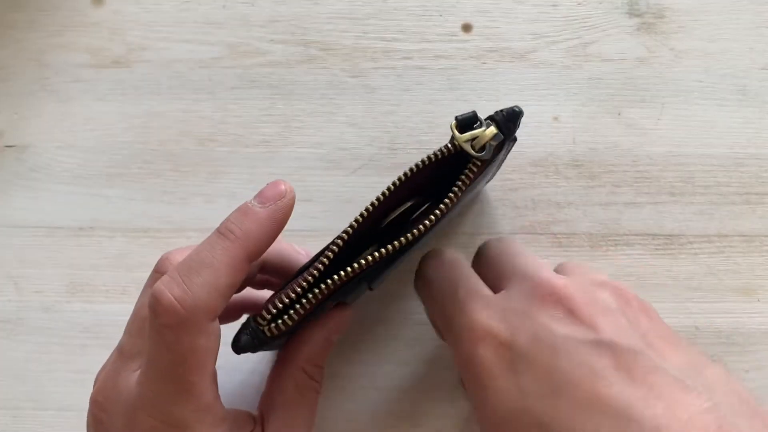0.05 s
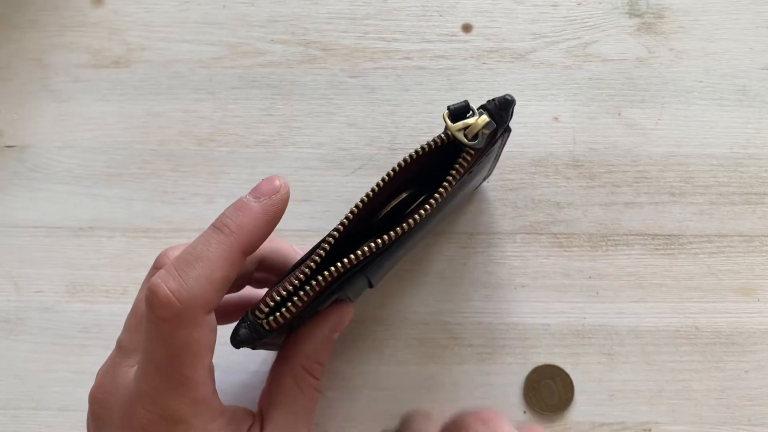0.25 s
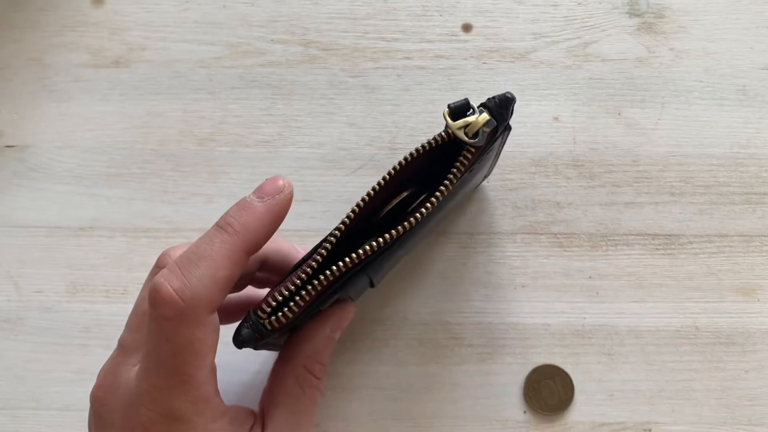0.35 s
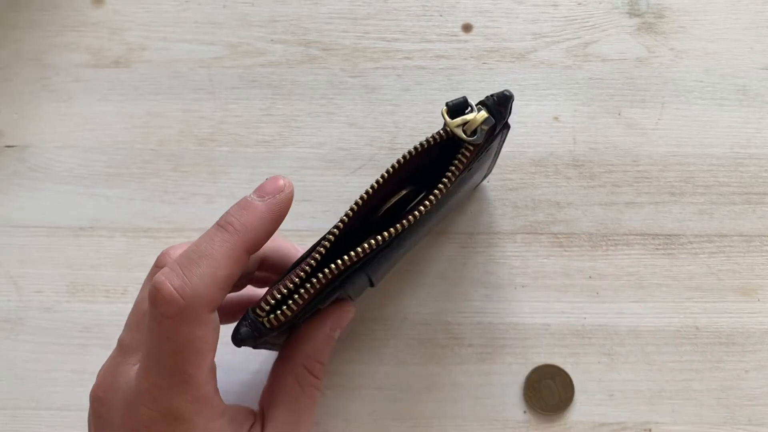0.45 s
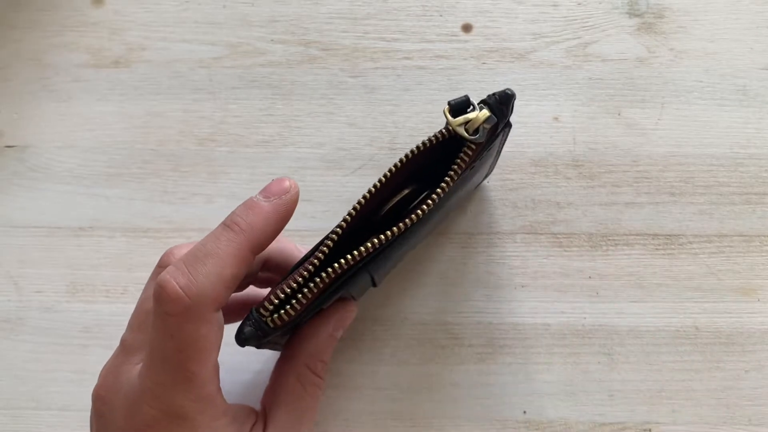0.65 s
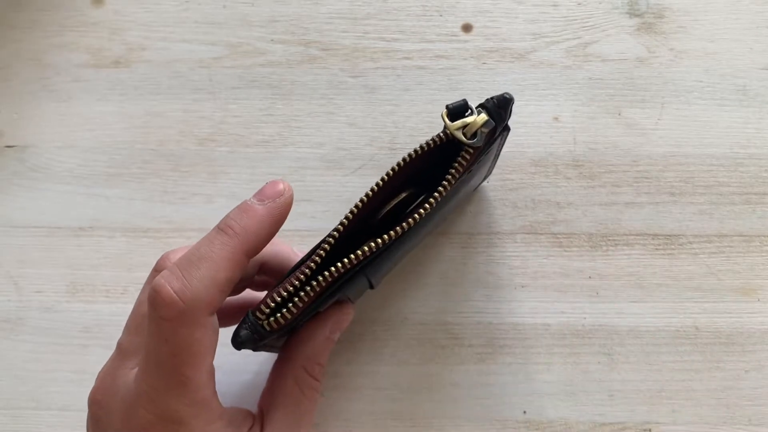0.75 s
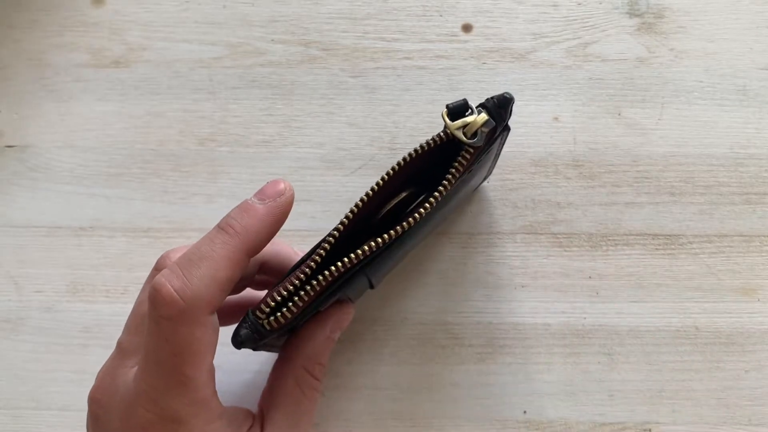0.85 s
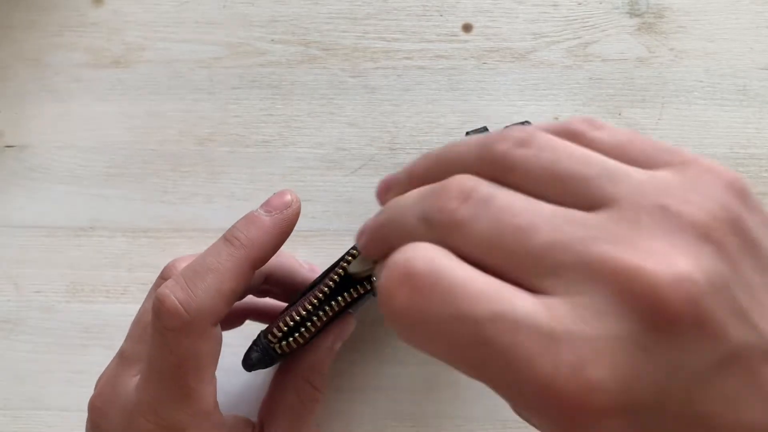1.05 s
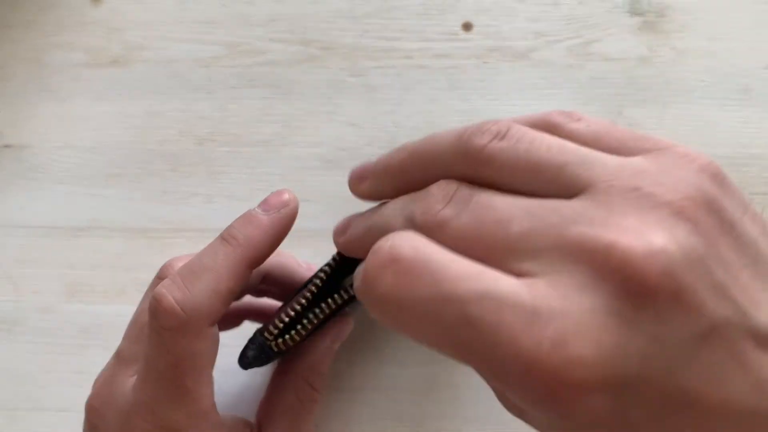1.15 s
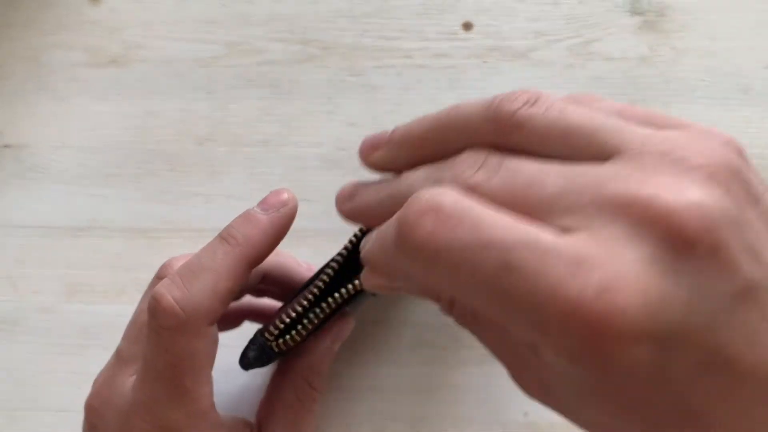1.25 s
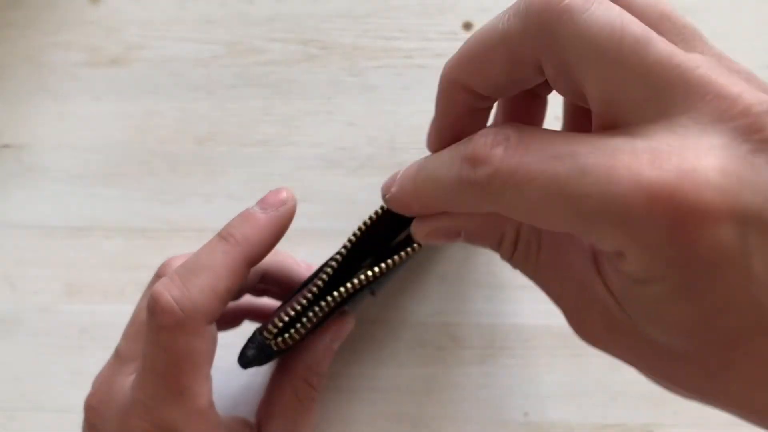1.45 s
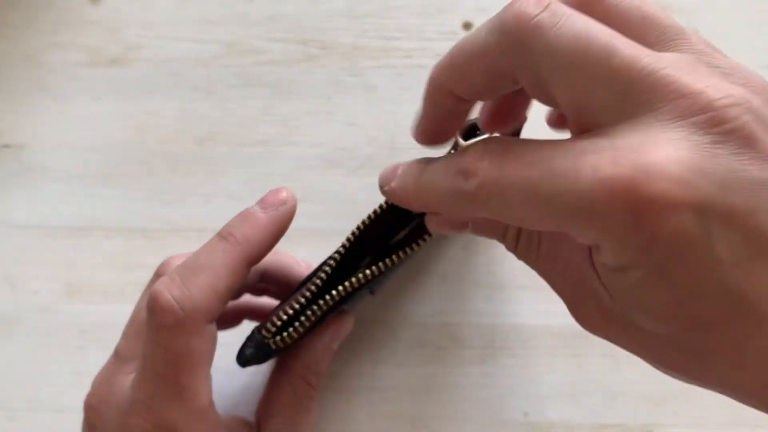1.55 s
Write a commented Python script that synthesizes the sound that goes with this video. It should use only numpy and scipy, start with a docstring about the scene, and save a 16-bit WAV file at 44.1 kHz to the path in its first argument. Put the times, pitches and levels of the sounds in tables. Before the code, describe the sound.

A coin is scraped off a wooden table and put in a leather purse, close up in a small room. A hand scuffs and brushes the wood until 0.4 seconds. Fingers knock onto the coin at 0.55 and drag it briefly, with a tick at the table edge near 0.7. From 1.0 the purse rustles and bumps softly, the coin clicking on zipper teeth around 1.1 and 1.5.

```python
"""A coin is dragged off a wooden table and pushed into a leather purse, close up in a small room.
A hand first brushes over the wood and lands on the coin with a knock. Stick-slip friction, a train of
tiny force pulses, drives the resonances of the wood and of the sliding contact. Short impacts make the
coin tick on the table edge and the zipper teeth, and it rings faintly in one high mode. The purse
rustles, bumps softly and shudders in the low modes of the table top."""
import sys
import numpy as np
from scipy import signal
from scipy.fft import rfft, irfft
from scipy.io import wavfile

SR = 44100
rng = np.random.default_rng(int(sys.argv[2]) if len(sys.argv) > 2 else 0)


def to_wav(sig):
    """Store sig (one row per channel, or 1-D mono) as 16-bit WAV at the path in sys.argv[1].

    Samples outside -1..1 are clipped; the rate is SR.
    """
    pcm = np.clip(np.atleast_2d(sig), -1, 1) * 32767
    pcm = np.round(pcm).astype(np.int16)
    wavfile.write(sys.argv[1], SR, pcm.T)  # frames by channels


N = 70560
T = np.arange(N) / SR

# low modes of the table top: pitch_hz, level_db
TABLE_MODES = [(57, -10), (124, -2.5), (192, -2.5), (250, -12)]


def from_db(db):
    """Decibels to amplitude ratio."""
    return 10 ** (np.asarray(db) / 20)


def rms_one(x):
    """Normalise to unit power."""
    return x / np.sqrt(np.mean(x ** 2) + 1e-20)


def at_hz(points, hz):
    """Interpolate on a logarithmic frequency axis."""
    f, v = np.transpose(points)
    return np.interp(np.log(np.maximum(hz, 1)), np.log(f), v)


def envelope(rows):
    """Amplitude envelope through (time_s, level_db) rows, silent outside them."""
    return from_db(np.interp(T, *np.transpose(rows), left=-200, right=-200))


def swell(peak_s, rise_s, fall_s):
    """Exponential growth and decay about a peak; times are per 20 dB."""
    return from_db(-20 * np.minimum(np.maximum((peak_s - T) / rise_s, (T - peak_s) / fall_s), 10))


def colour(x, spectrum):
    """Minimum-phase filter of unit power gain, built by folding the cepstrum."""
    size = 4096
    gain = rms_one(from_db(at_hz(spectrum, np.arange(size // 2 + 1) * SR / size)))
    cepstrum = irfft(np.log(gain))
    cepstrum[1:size // 2] *= 2
    cepstrum[size // 2 + 1:] = 0
    return signal.fftconvolve(x, irfft(np.exp(rfft(cepstrum))))[:N]


def resonate(x, hz, width_hz):
    """Forced response of a damped resonator with unit peak gain."""
    r = np.exp(-np.pi * width_hz / SR)
    feedback = [1, -2 * r * np.cos(2 * np.pi * hz / SR), r * r]
    return signal.lfilter(np.array([1, 0, -1]) * (1 - r * r) / 2, feedback, x + 1e-18)


def band(x, hz, widths):
    """Two resonators in cascade; their bandwidths are fractions of the centre frequency."""
    return resonate(resonate(x, hz, widths[0] * hz), hz, widths[1] * hz)


def ring(start_s, hz, t60_s):
    """Free vibration of one mode: an exponentially damped sine."""
    age = np.maximum(T - start_s, 0)
    return np.sin(2 * np.pi * hz * age) * np.exp(-np.log(1000) * age / t60_s)


def stick_slip(per_s, spread_db):
    """Friction as shot noise: pulses of uneven size at random moments, with unit power."""
    sizes = from_db(spread_db * np.minimum(rng.exponential(1, N), 4)) * rng.choice([-1, 1], N)
    return rms_one(sizes * (rng.random(N) < per_s / SR))


def impact(start_s, decay_s):
    """Contact force of unit energy: an impulse and a decaying burst of micro-slips."""
    age = np.arange(N) - int(start_s * SR)
    burst = (rng.standard_normal(N) + 2 * (age == 0)) * (age >= 0) * np.exp(-np.abs(age) / (decay_s * SR))
    return burst / np.sqrt(np.sum(burst ** 2))


def radiate(force, spectrum):
    """Each slip radiates its own way, which decorrelates the channels, most of all in the treble."""
    # side level relative to mid: frequency_hz, level_db
    sideways = [(100, -8), (1500, -7.5), (8000, -2.5), (11000, -2.5), (13000, 13.5)]
    mid = colour(force, spectrum)
    scattered = colour(force * rng.choice([-1, 1], N), spectrum)
    side_gain = np.sqrt(np.mean(from_db(at_hz(sideways, np.linspace(0, SR / 2, N))) ** 2))
    return mid + side_gain * colour(scattered, sideways) * np.array([[1], [-1]])


def wood(x, t60_s=0.03, ring_gain=.75):
    """The dense, irregular modes of the table top add an impulse response of decaying noise."""
    t = T[:SR // 10]
    modes = rng.standard_normal(len(t)) * from_db(-60 * t / t60_s)
    ringing = signal.fftconvolve(x, modes[None] / np.sqrt(np.sum(modes ** 2)), axes=1)[:, :N]
    return (x + ring_gain * ringing) / np.hypot(1, ring_gain)


def at_purse(x, lag_s=.00009):
    """Time and level differences: sound from the purse arrives earlier and louder on the left."""
    return np.array([x * from_db(2.5), np.interp(T - lag_s, T, x)])


def wander(x, pitch_share=.007, rate_hz=14):
    """Frequency modulation: resonances drift as the contact point travels over the wood."""
    drift = rms_one(resonate(rng.standard_normal(N), rate_hz, rate_hz))
    delay = pitch_share * np.cumsum(drift) / SR
    return np.array([np.interp(T - delay, T, channel) for channel in x])


def air():
    """Ambient noise: a quiet, steady floor, strongest in the bass."""
    # noise spectrum: frequency_hz, level_db
    spectrum = [(25, -42), (150, 12.5), (400, -0.5), (1000, -9), (16000, -35.5)]
    return from_db(-69) * radiate(rng.standard_normal(N), spectrum)


def room(x, build_s=0.0039):
    """Reverberation: a diffuse field decays in octave bands, faster and wider in the treble."""
    # reverberation time: frequency_hz, t60_s
    decay_times = [(550, 0.68), (1300, 0.15), (5000, 0.16), (12000, 0.089)]
    # strength of the tail: frequency_hz, level_db
    levels = [(150, -11), (600, -6.5), (12000, -10.5)]
    # stereo width: frequency_hz, side_to_mid_ratio
    widths = [(150, 0.21), (600, 0.12), (3000, 0.81)]
    t, tail = T[:SR * 3 // 4], 0
    for hz in 80 * 2. ** np.arange(8):
        shape = from_db(-60 * t / at_hz(decay_times, hz)) * (1 - np.exp(-t / build_s))
        octave = signal.butter(2, [hz / np.sqrt(2), hz * np.sqrt(2)], "band", fs=SR, output="sos")
        reflections = rng.standard_normal((2, len(t))) * shape / np.sqrt(np.sum(shape ** 2))
        mid, side = signal.sosfilt(octave, reflections)
        tail += from_db(at_hz(levels, hz)) * (mid + at_hz(widths, hz) * side * np.array([[1], [-1]]))
    return signal.fftconvolve(x, tail, axes=1)[:, :N]


def low_hum():
    """Room modes: a faint, hollow hum of narrow low resonances in the room."""
    # noise that drives the hum: time_s, level_db
    drive_levels = [(0, -28), (.85, -38), (1.1, -42)]
    # long-ringing room modes: pitch_hz, level_db
    modes = [(160, -7.5), (303, -1), (378, 2), (495, -10), (603, -4)]
    drive = envelope(drive_levels) * rng.standard_normal(N)
    return sum(from_db(db) * resonate(drive, hz, width_hz=8) for hz, db in modes)


def purse(undertone_ratio=0.594, undertone_db=-21):
    """Leather rustles by friction; soft bumps sound two purse modes; its shudder drives the table's."""
    # rustle under the fingers: time_s, level_db
    rustle = [(.96, -72), (.99, -55.5), (1.06, -69.5), (1.14, -63.5), (1.2, -67.5), (1.28, -100),
              (1.47, -87.5), (1.52, -58.5), (1.6, -73)]
    # spectrum of the leather: frequency_hz, level_db
    spectrum = [(200, 10.5), (1700, 13.5), (3500, 11), (6500, 0), (9000, -24), (15000, -11)]
    # bumps on the table: peak_s, level_db, pitch_hz
    contacts = [(1.009, -35, 195.6), (1.056, -41.5, 189.6), (1.102, -49, 122), (1.151, -40, 181.5),
                (1.198, -51, 120.6), (1.513, -39.5, 194), (1.554, -47.5, 168)]
    # shudder over the table: time_s, level_db
    shudder = [(.975, -72), (1.0, -49.5), (1.23, -55), (1.33, -64), (1.485, -74.5), (1.515, -46.5),
               (1.6, -54.5)]
    leather = at_purse(colour(envelope(rustle) * stick_slip(per_s=3400, spread_db=4.5), spectrum))
    bumps = 0
    for s, db, hz in contacts:
        phase = 2 * np.pi * hz * (T - s)
        tone = np.cos(phase) + from_db(undertone_db) * np.cos(undertone_ratio * phase)
        bumps += from_db(db) * swell(s, rise_s=.022, fall_s=.032) * tone
    slips = rng.standard_normal(N)
    modes = sum(from_db(db) * rms_one(band(slips, hz, widths=(0.034, 1))) for hz, db in TABLE_MODES)
    return leather + bumps + envelope(shudder) * modes


def hand_brush():
    """Sliding friction of skin excites the wood in one long brush and several short scuffs."""
    # the long brush: time_s, level_db
    stroke = [(.165, -84.5), (.198, -47.5), (.248, -38), (.275, -32), (.33, -33), (.372, -38),
              (.392, -36.5), (.412, -54.5), (.47, -83)]
    # its spectrum: frequency_hz, level_db
    brush_spectrum = [(120, -43.5), (200, -11), (470, -23), (600, -7), (1500, 4), (8580, -0.5), (12200, -3),
                      (14500, -67.5)]
    # short scuffs: peak_s, level_db, rise_s, fall_s
    touches = [(.007, -48, 0.01, 0.089), (0.082, -38.5, .005, 0.056), (0.175, -38, 0.0046, 0.044),
               (0.422, -36, 0.0035, 0.021), (0.729, -46, 0.0049, 0.03)]
    # their spectrum: frequency_hz, level_db
    scuff_spectrum = [(120, -31), (200, -19.5), (1230, -2.5), (2650, -1), (3310, -5), (5130, -0.5),
                      (11500, -17), (16000, -47)]
    brush = radiate(envelope(stroke) * stick_slip(per_s=3000, spread_db=3.5), brush_spectrum)
    scuffing = sum(from_db(db) * swell(s, rise, fall) for s, db, rise, fall in touches)
    scuffs = radiate(scuffing * stick_slip(per_s=9000, spread_db=7.0), scuff_spectrum)
    return wood(brush + scuffs)


def skin_catches():
    """Skin catches on the grain: sparse stick-slip pulses give gritty bands of treble."""
    # catches: peak_s, level_db, fall_s, centre_hz
    catches = [(0.255, -33.5, 0.0049, 2750), (0.266, -34.5, .05, 3830), (0.314, -30, .035, 4480),
               (0.389, -33, 0.032, 4900)]
    grit = stick_slip(per_s=890, spread_db=-1.0)
    return sum(from_db(db) * swell(s, .004, fall) * rms_one(band(grit, hz, widths=(0.38, 0.38)))
               for s, db, fall, hz in catches)


def hand_rubs():
    """Dull rubs and bumps of the hand: band-limited noise carries a vague pitch."""
    # rubs: peak_s, level_db, rise_s, fall_s, centre_hz
    rubs = [(.008, -40, 0.026, 0.031, 668), (0.01, -48, 0.04, .12, 295), (0.11, -54.5, 0.084, 0.13, 189),
            (0.223, -39, 0.04, 0.084, 690), (.285, -45, 0.13, 0.021, 1260),
            (0.339, -40, 0.0059, 0.031, 329), (0.396, -46.5, 0.028, 0.033, 746),
            (1.072, -51.5, 0.008, 0.01, 887)]
    sound = 0
    for s, db, rise, fall, hz in rubs:
        friction = rms_one(band(rng.standard_normal(N), hz, widths=(0.28, 1)))
        sound += from_db(db) * swell(s, rise, fall) * friction
    return sound


def coin_ticks():
    """Brief metal impacts give broadband ticks; the loosely held coin vibrates freely in a high mode."""
    # impacts on the table edge and zipper teeth: start_s, level_db, pitch_hz
    ticks = [(.729, -19.5, 9900), (1.1085, -17, 3376), (1.1243, -19, 5370), (1.1772, -24.5, 3320),
             (1.4872, -40.5, 3143), (1.5145, -19, 3220), (1.542, -29.5, 10200), (1.56, -18, 6240),
             (1.5786, -21.5, 7300)]
    # their broadband spectrum: frequency_hz, level_db
    spectrum = [(400, -21), (1400, -7), (3300, 2.5), (4700, 0.5), (6700, 9.5), (8500, -17), (12000, -22),
                (16000, -12.5)]
    # free rings of the coin: start_s, level_db
    rings = [(1.5142, -40), (1.5597, -47)]
    clicks = 0
    for s, db, hz in ticks:
        force = from_db(db) * impact(s, decay_s=.0005)
        clicks += 1.016 * colour(force, spectrum) + 3.2 * band(force, hz, widths=(.3, .3))
    ringing = sum(from_db(db) * ring(s, hz=14940, t60_s=0.12) for s, db in rings)
    waver = rms_one(resonate(rng.standard_normal(N), hz=60, width_hz=120))
    return at_purse(clicks + ringing * (1 + .5 * waver))


def coin_drag(crossover_hz=6500):
    """The fingers' impact, then stick-slip friction, excite the contact resonances of coin on wood."""
    # effort of the drag: time_s, level_db
    effort = [(.53, -68.5), (.538, -30), (.564, -26.5), (.577, -25.5), (.596, -23.5), (.614, -25.5),
              (.642, -37), (.66, -32.5), (.675, -49.5), (.72, -58.5)]
    # spectrum of the scrape: frequency_hz, level_db
    scrape_spectrum = [(150, -34.5), (566, -10.5), (1340, -9.5), (1530, -2.5), (4490, -1), (9820, -7),
                       (12400, -15), (16000, -111)]
    # gain above the crossover: time_s, gain_db
    treble = [(.55, -8.5), (.59, 3), (.67, 3)]
    # the fingers land on the coin: start_s, level_db
    landings = [(.537, -3.5)]
    # spectrum of that knock: frequency_hz, level_db
    knock_spectrum = [(120, -23.5), (300, 1), (800, 3), (2500, 9.5), (5500, -1), (11000, -31),
                      (14000, -62.5)]
    # resonances of the coin pressed on the wood: pitch_hz, width_hz, level_db
    contact_modes = [(1554, 89, -2), (2320, 50, -0.5), (2634, 140, 1.5), (3890, 84, 0.5), (4336, 170, 4),
                     (5140, 290, 3.5)]
    edge_slip = from_db(-32.5) * swell(peak_s=.783, rise_s=.012, fall_s=.026)
    friction = (envelope(effort) + edge_slip) * stick_slip(per_s=3500, spread_db=2.5)
    scrape = radiate(friction, scrape_spectrum)
    crossover = (signal.butter(2, crossover_hz, kind, fs=SR, output="sos") for kind in ("low", "high"))
    low, high = (signal.sosfilt(np.tile(sos, (2, 1)), scrape) for sos in crossover)
    scrape = low + high * from_db(np.interp(T, *np.transpose(treble)))
    knock = radiate(sum(from_db(db) * impact(s, decay_s=.0016) for s, db in landings), knock_spectrum)
    # the knock also wakes the table's low modes, all but the deepest
    thud = sum(from_db(db - 42.5) * ring(s, hz, t60_s=0.068)
               for s, _ in landings for hz, db in TABLE_MODES[1:])
    contact = wood(scrape) + knock
    resonances = sum(from_db(db) * resonate(contact, hz, width) for hz, width, db in contact_modes)
    return 0.74 * contact + wander(resonances) + resonate(thud, hz=200, width_hz=150)


def scene():
    """Superposition of direct sound, reverberation and ambient noise, balanced slightly to the right."""
    hand = hand_brush() + skin_catches() + hand_rubs()
    sources = hand + coin_drag() + coin_ticks() + purse() + low_hum()
    return (sources + room(sources) + air()) * from_db([[-.4], [.4]])


def record(dry, low_cut_hz=50, stopband_hz=17000):
    """Band limiting: the microphone loses the deep bass, and the top is cut steeply."""
    x = signal.sosfilt(signal.butter(2, low_cut_hz, "high", fs=SR, output="sos"), dry)
    return signal.sosfilt(signal.cheby2(14, 70, stopband_hz, fs=SR, output="sos"), x)


dry = scene()
out = record(dry)
to_wav(out)
```